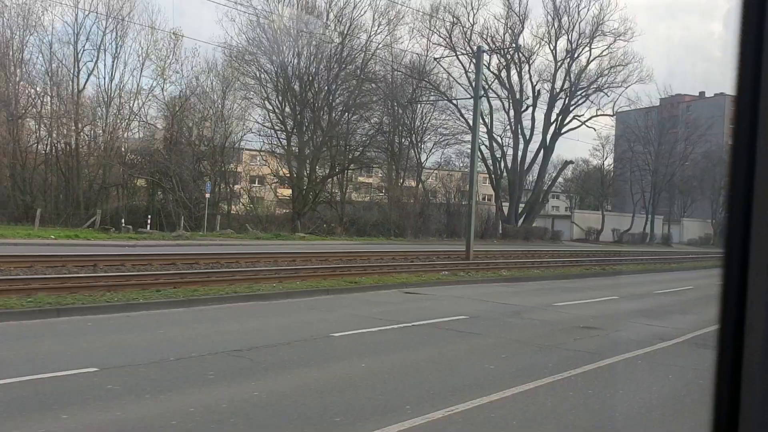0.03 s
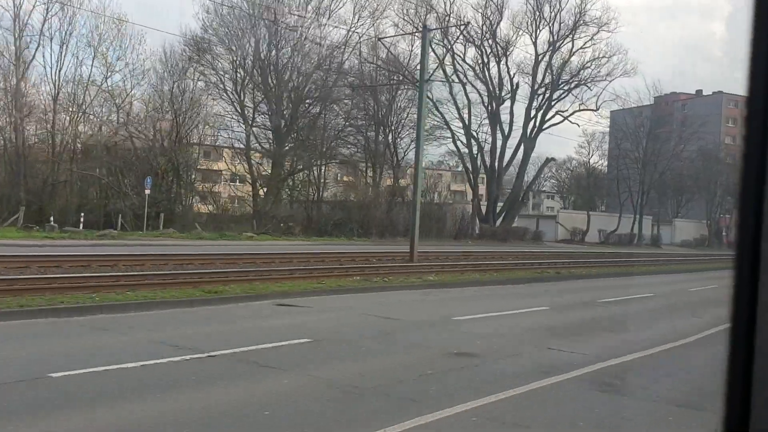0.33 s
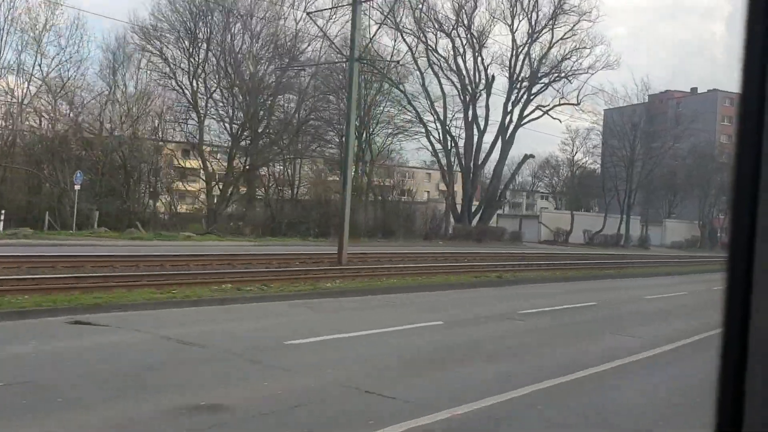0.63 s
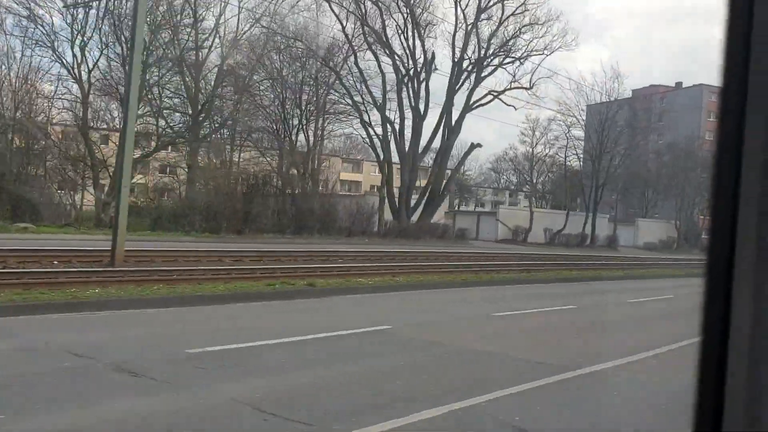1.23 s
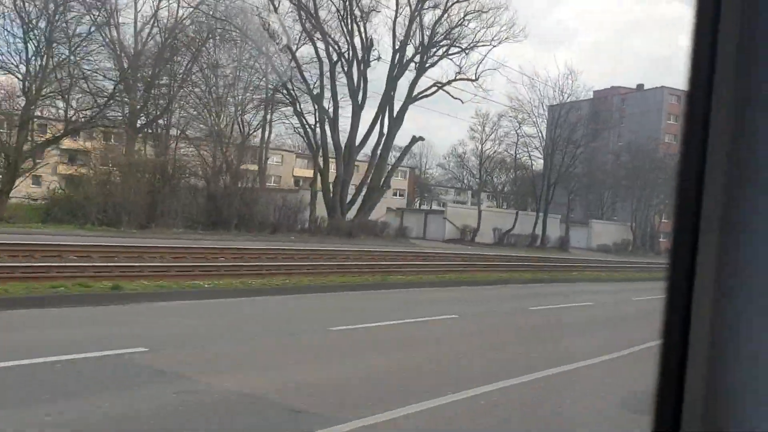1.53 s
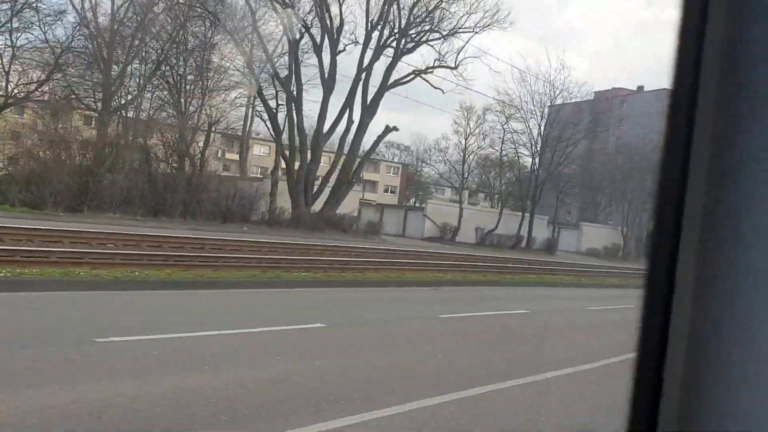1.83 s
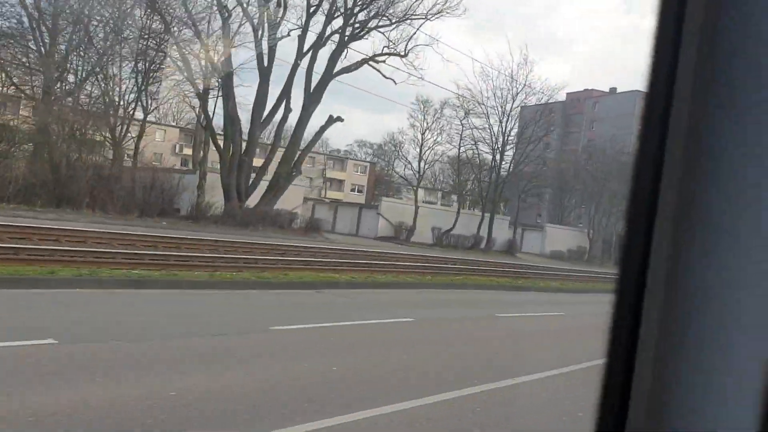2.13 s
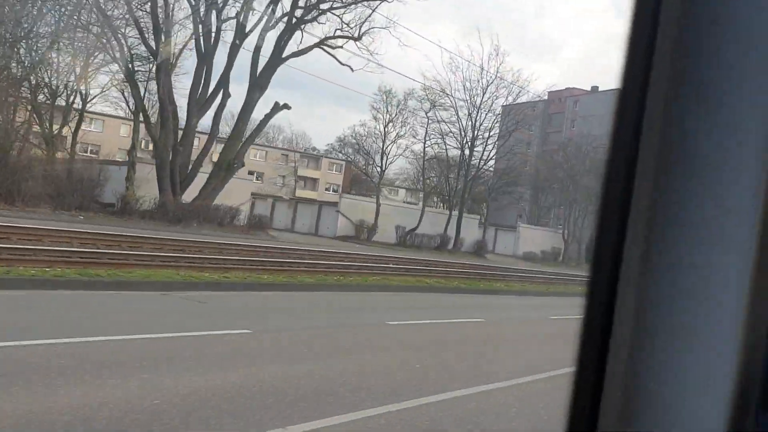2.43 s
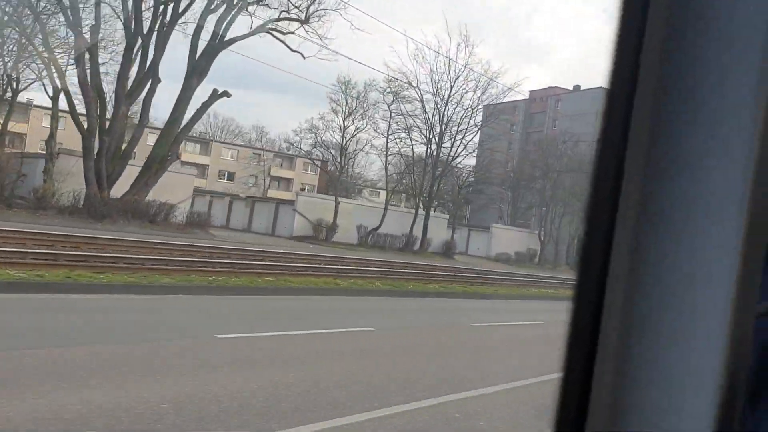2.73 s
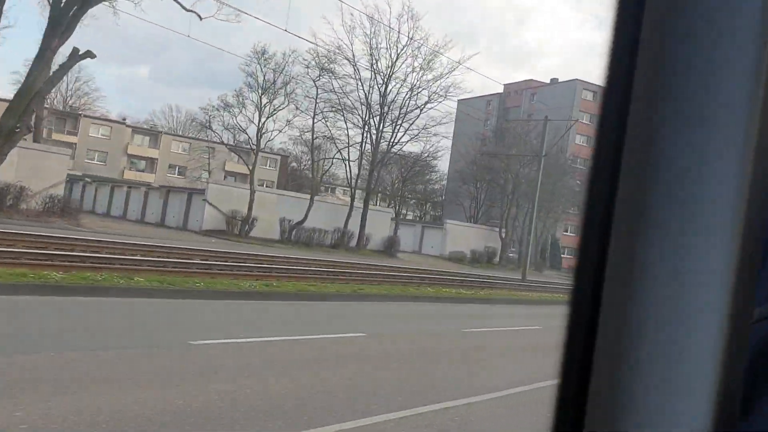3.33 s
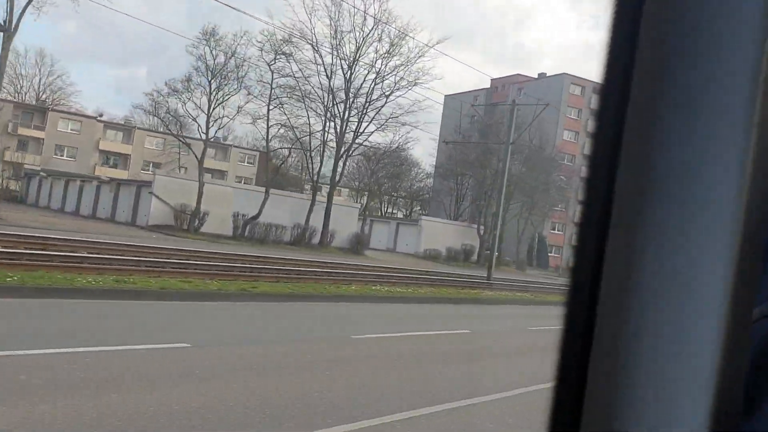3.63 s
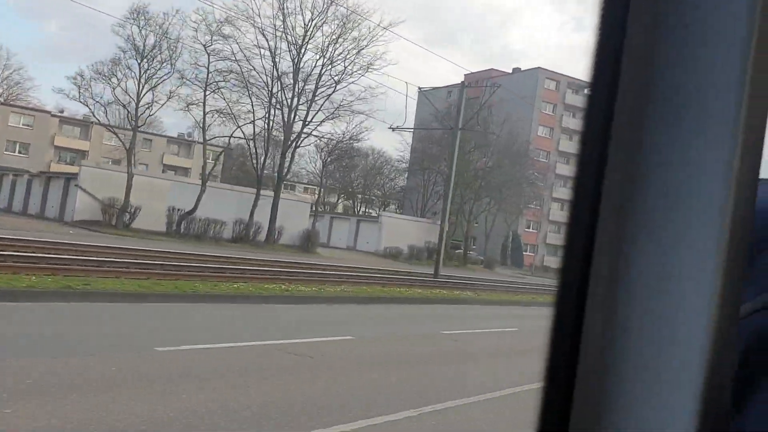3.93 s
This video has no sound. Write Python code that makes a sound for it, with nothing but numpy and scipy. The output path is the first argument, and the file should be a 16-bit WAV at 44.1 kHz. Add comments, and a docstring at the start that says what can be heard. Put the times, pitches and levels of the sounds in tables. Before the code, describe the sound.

Low rumble inside a moving tram, its wheels grinding and thumping over rail joints.

```python
"""A tram's car body rumbles and booms through a bend, heard from a stereo microphone at a window seat.
Under the floor the wheels roar on uneven rail; their flanges grind, hiss and briefly sing as they stick
and slip. Rail joints send clacks and thumps up through the floor. After them the track is smoother and
quieter, and the drive hums up from below. Glass and walls close to the microphone add short echoes."""
import sys
import numpy as np
from scipy import signal
from scipy.fft import rfft, irfft
from scipy.io import wavfile

SR = 44100
rng = np.random.default_rng(int(sys.argv[2]) if len(sys.argv) > 2 else 0)


def pcm_store(signal):
    """Save signal as 16-bit PCM."""
    levels = np.round(np.clip(np.atleast_2d(signal), -1, 1) * 32767)
    wavfile.write(sys.argv[1], SR, levels.astype(np.int16).T)


N = 176400
TIME = np.arange(N) / SR
BIN_HZ = np.maximum(np.arange(N // 2 + 1) * SR / N, 1)
BODY_PAN_DB, WHEEL_PAN_DB, FLOOR_PAN_DB = 1.3, 3.5, 0.5  # left over right at the microphone


# Shaking of the car body around the seat: (time [s], level [dB])
BODY_SHAKE = [(0.09, -24), (0.55, -26), (0.68, -19.5), (1.03, -24.5), (1.06, -41), (1.1, -27),
              (1.17, -32.5), (1.22, -14.5), (1.25, -24.5), (1.53, -19), (1.88, -32), (2.14, -17.5),
              (2.23, -34), (3.22, -31.5), (3.55, -33), (3.72, -28), (3.98, -32.5)]
# Spectrum of its rumble: (frequency [Hz], relative level [dB])
RUMBLE_SPECTRUM = [(20, -1), (45, -6), (62, 0.5), (85, 1.5), (120, -1), (160, -12.5), (250, -27),
                   (500, -47)]
# Its deepest booming: (time [s], level [dB])
BODY_BOOM = [(0.09, -40), (0.64, -37), (0.68, -32.5), (2.27, -25.5), (2.84, -46), (3.96, -39)]

def body():
    """All around the microphone the shaken car rumbles, with a slow boom beneath it."""
    (shake_db,), (boom_db,) = in_time(BODY_SHAKE), in_time(BODY_BOOM)
    rumble = from_db(shake_db) * cabin_noise(RUMBLE_SPECTRUM, flutter_db=1.5, flutter_hz=4.7)
    boom = from_db(boom_db) * rough_tone(hz=38, width=19)
    return (rumble + boom) * pan(BODY_PAN_DB)


# Rolling noise from under the floor: (time [s], level [dB])
ROLL_LEVEL = [(0.11, -32.5), (0.42, -33.5), (1.18, -31.5), (1.32, -30.5), (1.96, -34.5), (2.09, -28),
              (2.15, -33), (2.3, -31.5), (2.31, -35.5), (3.04, -38.5), (3.53, -37), (3.81, -36),
              (3.98, -36)]
# Spectrum of the roar at the seat: (frequency [Hz], relative level [dB])
ROAR_SPECTRUM = [(90, -23), (160, 3), (230, 0), (275, -5), (440, -7), (570, -12), (850, -13), (1200, -19),
                 (1850, -29.5), (2700, -31.5), (4500, -37.5), (7200, -51), (8600, -54.5), (12000, -71)]
# Floor and panel resonances: (frequency [Hz], nominal width [Hz], level against ROLL_LEVEL [dB])
PANEL_MODES = [(94.9, 7.8, -6.5), (204.3, 7, -12), (328, 26, -8.5)]

def rolling():
    """Below the seat the wheels roar on uneven rail and make the nearby panels boom."""
    roll_db, = in_time(ROLL_LEVEL)
    roar = cabin_noise(ROAR_SPECTRUM, flutter_db=1, flutter_hz=18)
    roar_gain = from_db(2 + .5 * drift(22))
    boom = sum(from_db(db) * rough_tone(hz, width) for hz, width, db in PANEL_MODES)
    return from_db(roll_db) * (roar_gain * roar * pan(WHEEL_PAN_DB) + boom * pan(FLOOR_PAN_DB))


# Jolts of the bogie into the floor: (time [s], level [dB], frequency [Hz])
BOGIE_JOLTS = [(1.205, -22, 70), (1.501, -15.5, 152), (1.533, -12.5, 65), (2.08, -24, 48.3),
               (2.118, -16, 61.4), (2.499, -25, 54.3)]

def thumps():
    """Each jolt makes the floor under the microphone boom briefly."""
    booms = sum(from_db(db) * blow(s, rise=.0048, fall=.024) * rough_tone(hz, width=21.7)
                for s, db, hz in BOGIE_JOLTS)
    return booms * pan(BODY_PAN_DB)


# Wheels and fittings clack at rail joints:
# (time [s], level before dulling [dB], left over right [dB], resonance [Hz])
RAIL_JOINTS = [(1.256, -34.5, 3, 2270), (1.421, -38, 4, 2230), (1.5052, -24.5, 3.5, 3300),
               (1.533, -29, 0, 596), (1.551, -39, 21, 4170), (2.0647, -27.5, 6, 2450),
               (2.171, -27.5, 6, 616), (2.241, -35, 2, 2670), (2.266, -33.5, 1, 1000),
               (2.319, -38.5, 0, 2400)]
# Spectrum of the knock in each clack: (frequency [Hz], relative level [dB])
KNOCK_SPECTRUM = [(100, -5), (250, 18), (600, 11), (1150, 9), (1900, 0), (2700, 10), (3900, -16), (4550, 5),
                  (5000, -14), (7000, -21), (9000, -34)]

def joints():
    """Each joint clacks into the cabin and rings the wheel; a lower resonance gives a duller clack."""
    knock = cabin_noise(KNOCK_SPECTRUM, flutter_db=1, flutter_hz=20)
    white = rng.standard_normal((2, N))
    clacks, force = 0, 0
    for s, db, pan_db, hz in RAIL_JOINTS:
        strength = from_db(db) * pan(pan_db)
        crack = blow(s, rise=.003, fall=.009)
        cabin_tail = from_db(-19) * blow(s, rise=.009, fall=.098)
        bite = from_db(-2.5) * unit_rms(resonate(white, hz, width=hz / 3))
        dulling = signal.butter(2, 2.2 * hz, fs=SR, output="sos")
        clacks = clacks + strength * np.hypot(crack, cabin_tail) * signal.sosfilt(dulling, knock + bite)
        force = force + strength * crack
    ringing = from_db(-12) * np.std(clacks) * wheel_ring(force * white)
    return clacks + ringing


# Modes of the steel wheels: (frequency [Hz], relative level [dB])
WHEEL_RESONANCES = [(1209, -10), (1356, 5), (1661, 0), (2355, 0), (2735, 0.5), (3522, 4), (3772, -7),
                    (4565, -18), (5035, -5.5), (5579, -6), (5808, -12)]

def wheel_ring(force, t60_s=0.4):
    """A struck or rubbed wheel rings on in its modes; rms 1."""
    width = np.log(1000) / np.pi / t60_s
    return unit_rms(sum(from_db(db) * resonate(force, hz, width) for hz, db in WHEEL_RESONANCES))


# Flanges grinding on the rail, mostly to the left: (time [s], level [dB], left over right [dB])
GRIND_LEVEL = [(0.09, -52.5, 0), (0.26, -49, 0.5), (0.52, -53.5, 2), (0.88, -49, 0), (0.96, -40.5, 1.5),
               (1.45, -46, 1), (1.54, -38, 1.5), (1.71, -43.5, 2), (1.75, -40, 2.5), (1.89, -46.5, 1),
               (1.98, -48, 3), (2.055, -47, 9), (2.09, -40.5, 3), (2.22, -42, 6), (2.27, -42, 5),
               (2.38, -45, 5), (2.53, -52, 6), (2.87, -60, 8), (3.64, -56, 7), (3.72, -52.5, 4),
               (3.98, -58.5, 8)]
# Spectrum of the grinding: (frequency [Hz], relative level [dB])
GRIND_SPECTRUM = [(300, -41), (700, -20), (1200, 10), (1900, 4.5), (2600, 8), (4300, 5), (5100, 2),
                  (7500, -4.5), (8600, -42), (12000, -40)]
# Top hiss of steel on steel: (time [s], level [dB])
HISS_LEVEL = [(0.16, -70), (0.2, -58.5), (0.47, -69), (0.68, -62.5), (0.76, -55.5), (0.88, -59),
              (0.94, -49), (1.0, -53.5), (1.12, -53), (1.19, -55), (1.27, -53), (1.31, -60.5),
              (1.56, -46.5), (1.69, -54.5), (1.74, -50.5), (2.05, -60), (2.12, -49), (2.34, -58.5),
              (2.45, -58.5), (2.54, -67.5), (2.82, -78.5), (3.24, -80), (3.34, -72), (3.64, -77),
              (3.72, -62.5), (3.98, -68)]
# Spectrum of the hiss: (frequency [Hz], relative level [dB])
HISS_SPECTRUM = [(3500, -16), (6000, 1.5), (7700, 0.5), (8900, -8), (10500, -4), (12500, -3.5), (14000, -8),
                 (16000, -10.5)]
# The flange catches with a short bright scrape: (time [s], level [dB])
FLANGE_CATCHES = [(0.193, -60), (.9, -50), (1.255, -56), (1.55, -56), (1.82, -55), (3.7, -55)]

def flanges():
    """Juddering friction down at the rail: grinding, rubbed wheel modes and a hiss with short scrapes."""
    (grind_db, pan_db), (hiss_db,) = in_time(GRIND_LEVEL), in_time(HISS_LEVEL)
    judder = drift(48)  # shakes grind and hiss together
    rubbed = from_db(-16) * wheel_ring(rng.standard_normal((2, N)))
    friction = cabin_noise(GRIND_SPECTRUM, flutter_db=1.6, flutter_hz=14)
    grind = from_db(grind_db + .27 * judder) * (friction + rubbed)
    scrapes = sum(from_db(db) * blow(s, rise=.003, fall=.011) for s, db in FLANGE_CATCHES)
    sliding = from_db(hiss_db + .5 + .83 * judder) * np.hypot(1, grit())
    hiss = np.hypot(sliding, scrapes) * cabin_noise(HISS_SPECTRUM, flutter_db=2.4, flutter_hz=14)
    return grind * pan(pan_db) + hiss


def grit(ticks_per_s=26, tick_db=-1, spread_db=5, fall_s=.005):
    """Envelope of grit ticking under the flanges, at random times and of uneven size."""
    hits = rng.random(N) < ticks_per_s / SR
    sizes = from_db(tick_db + spread_db * np.clip(rng.standard_normal(N), -2, 2))
    return signal.lfilter([1], [1, -np.exp(-1 / (fall_s * SR))], hits * sizes + 1e-18)


# Brief wheel groans and rings: (time [s], fall [s], frequency [Hz], nominal width [Hz], level [dB])
WHEEL_SLIPS = [(0.069, 0.3, 1030, 53, -43), (1.77, 0.069, 7340, 1000, -49), (2.066, 0.04, 4580, 18, -46),
               (2.098, .035, 5577, 22, -47), (2.118, .04, 5033, 25, -52)]

def groans():
    """Below and a little to the left, a slipping wheel sounds one rough resonance, which dies away."""
    tones = sum(from_db(db) * blow(s, rise=.015, fall=fall) * rough_tone(hz, width)
                for s, fall, hz, width, db in WHEEL_SLIPS)
    return tones * pan(WHEEL_PAN_DB)


# The drive hums up on the smooth track: (time [s], level [dB])
DRIVE_LEVEL = [(0, -58), (2.4, -43.5), (3.1, -49), (3.8, -33.5), (4, -38)]
# Its rough tones: (frequency [Hz], nominal width [Hz], level against DRIVE_LEVEL [dB])
MOTOR_TONES = [(111.84, 3.9, 4), (179, 18, -4.5), (405, 10, -5.5), (434.2, 8.6, -11.5)]

def drive():
    """Motors and gears hum roughly, heard through the floor."""
    drive_db, = in_time(DRIVE_LEVEL)
    hum = sum(from_db(db) * rough_tone(hz, width) for hz, width, db in MOTOR_TONES)
    return from_db(drive_db) * hum * pan(FLOOR_PAN_DB)


# Swells of a thin wheel squeal: (middle time [s], whistle level [dB], overtone level [dB])
SQUEAL_SWELLS = [(2.5, -67, -80), (2.655, -71, -81), (2.725, -74, -90), (3.765, -66, -80),
                 (3.86, -61.5, -76), (3.955, -66, -73)]
# Its overtones: (frequency [Hz], relative level [dB])
OVERTONES = [(11719, -3), (12785, -2)]

def squeal(whistle_hz=6164, swell_s=.1):
    """Stick and slip makes a wheel sing in short swells, faint at the seat."""
    whistle = wavering_tone(whistle_hz)
    overtones = sum(from_db(db) * wavering_tone(hz) for hz, db in OVERTONES)
    singing = 0
    for s, whistle_db, overtone_db in SQUEAL_SWELLS:
        swell = np.cos(np.pi * np.clip((TIME - s) / swell_s, -.5, .5))
        singing = singing + swell * (from_db(whistle_db) * whistle + from_db(overtone_db) * overtones)
    return singing


def reflections(count=12, span_s=.008, echo_db=-8, above_hz=550):
    """Frequency response of glass and walls near the microphone: short echoes, different on each side."""
    taps = np.zeros((2, N))
    for side in taps:
        delays = (rng.uniform(.04, 1, count) * span_s * SR).astype(int)
        side[delays] = rng.choice([-1, 1], count)
    return 1 + from_db(echo_db) / np.sqrt(count) * rfft(taps) * BIN_HZ / (BIN_HZ + above_hz)


# Likeness of left and right at the microphone: (frequency [Hz], correlation [-1 to 1])
CABIN_LIKENESS = [(60, 0.96), (150, 1), (260, 1), (400, 0.66), (600, 0.63), (1000, -0.2), (2000, -0.059),
                  (12000, 0)]

def stereo(mid, side, hz):
    """Mix two noises to left and right as the cabin does: alike in the bass, wide in the treble."""
    alike = np.clip(at_hz(CABIN_LIKENESS, hz), -.99, .995)
    return np.sqrt(1 + alike) * mid + np.sqrt(1 - alike) * side * np.array([[1], [-1]])


def cabin_noise(colour, flutter_db, flutter_hz):
    """Coloured stereo noise as it reaches the seat, each half octave fluttering on its own; rms 1."""
    white = stereo(*rfft(rng.standard_normal((2, N))), BIN_HZ)
    low_cut = np.minimum(BIN_HZ / colour[0][0], 1) ** 2
    high_cut = np.minimum(colour[-1][0] / BIN_HZ, 1) ** 4
    spectrum = white * from_db(at_hz(colour, BIN_HZ)) * reflections() * low_cut * high_cut
    half_octave = np.clip(2 * np.log2(BIN_HZ / 30), 0, 18)
    bands = (irfft(spectrum * np.maximum(1 - abs(half_octave - k), 0), N) for k in range(19))
    return unit_rms(sum(band * from_db(flutter_db * drift(flutter_hz)) for band in bands))


def rough_tone(hz, width):
    """Stereo noise passed twice through one resonance; rms 1."""
    once = resonate(rng.standard_normal((2, N)), hz, 2 * width)
    return unit_rms(stereo(*resonate(once, hz, 2 * width), hz))


def wavering_tone(hz, wander_hz=8.5, waver_db=1):
    """One thin tone that wavers in pitch and level, differently on each side; rms 1."""
    phase = 2 * np.pi * np.cumsum(hz + wander_hz * drift(25)) / SR
    sides = [np.sin(phase + .5 * drift(3.3)) * from_db(waver_db * drift(14)) for _ in range(2)]
    return unit_rms(np.array(sides))


def blow(s, rise, fall):
    """Envelope of a blow at time s: a quick rise, then an exponential fall; all in seconds."""
    age = np.maximum(TIME - s, 0)
    return np.minimum(age / rise, 1) * np.exp(-np.maximum(age - rise, 0) / fall)


def resonate(x, hz, width):
    """A two-pole resonance with gain 1 at its peak; width in Hz."""
    r = np.exp(-np.pi * width / SR)
    feedback = [1, -2 * r * np.cos(2 * np.pi * hz / SR), r * r]
    return signal.lfilter(np.array([1, 0, -1]) * (1 - r * r) / 2, feedback, x + 1e-18)


def drift(rate_hz):
    """Slow random wander of spread 1."""
    step, settle = 40, 2000
    r = np.exp(-2 * np.pi * rate_hz * step / SR)
    slow = signal.lfilter([1], [1, -2 * r, r * r], rng.standard_normal(N // step + settle + 2))[settle:]
    return np.interp(np.arange(N) / step, np.arange(len(slow)), unit_rms(slow))


def pan(db):
    """Left and right gains for a level difference, at constant power."""
    gains = from_db(np.array([[.5], [-.5]]) * db)
    return gains / np.sqrt(np.mean(gains ** 2, axis=0))


def in_time(rows):
    """Each column of a curve at every sample."""
    times, *columns = np.transpose(rows)
    return [np.interp(TIME, times, column) for column in columns]


def at_hz(points, hz):
    """Read a spectrum on a log-frequency axis."""
    frequencies, values = np.transpose(points)
    return np.interp(np.log(hz), np.log(frequencies), values)


def from_db(db):
    """Decibels to gain."""
    return 10 ** (np.asarray(db) / 20)


def unit_rms(x):
    """Scale to rms 1."""
    return x / np.sqrt(np.mean(x ** 2) + 1e-20)


def scene():
    """Everything that reaches the microphone at the window seat."""
    return body() + rolling() + thumps() + joints() + flanges() + groans() + drive() + squeal()


def record(dry):
    """The microphone's signal cuts in and out without a click; the very top is cut off."""
    start_s, cutoff_hz = .069, 15750
    gate = np.clip(np.minimum((TIME - start_s) / .001, (TIME[-1] - TIME) / .006), 0, 1)
    return signal.sosfilt(signal.ellip(12, .1, 80, cutoff_hz, fs=SR, output="sos"), dry * gate)


dry = scene()
out = record(dry)
pcm_store(out)
```